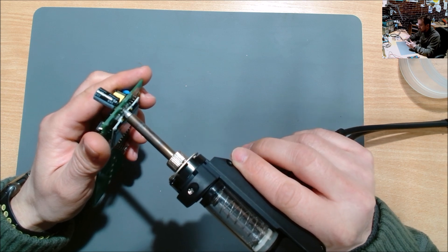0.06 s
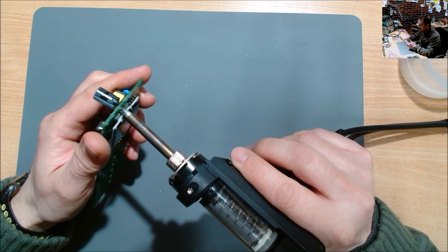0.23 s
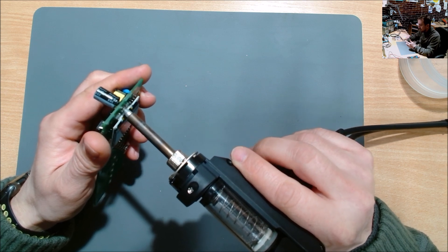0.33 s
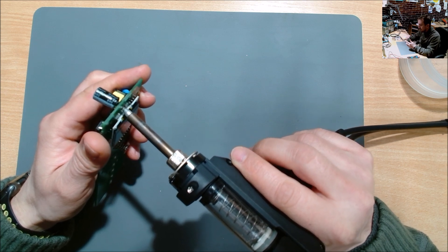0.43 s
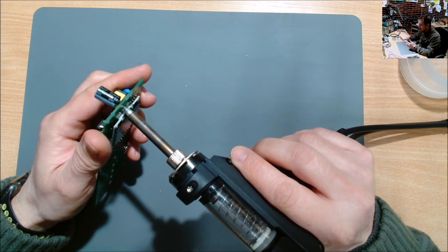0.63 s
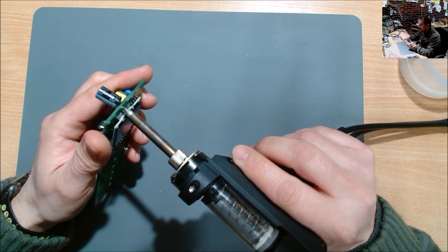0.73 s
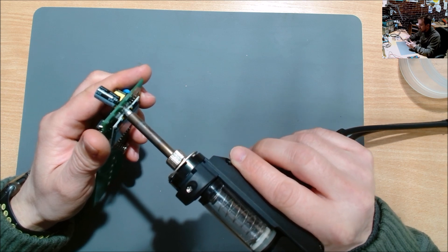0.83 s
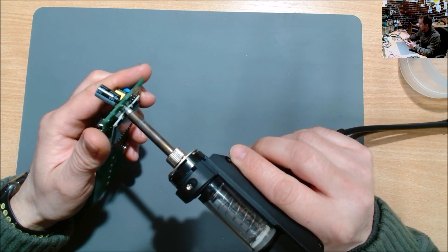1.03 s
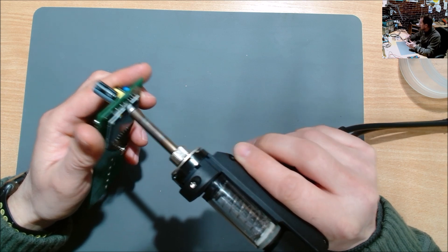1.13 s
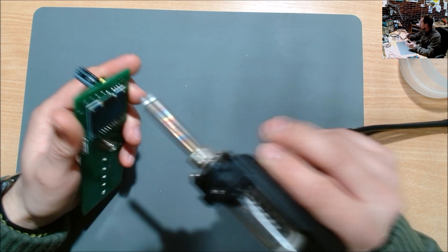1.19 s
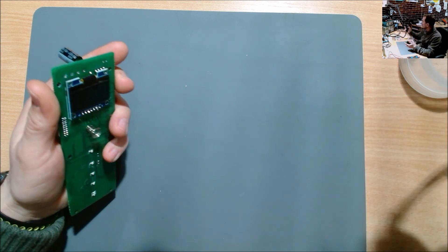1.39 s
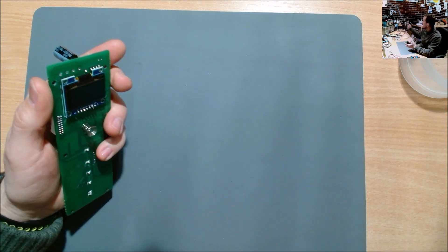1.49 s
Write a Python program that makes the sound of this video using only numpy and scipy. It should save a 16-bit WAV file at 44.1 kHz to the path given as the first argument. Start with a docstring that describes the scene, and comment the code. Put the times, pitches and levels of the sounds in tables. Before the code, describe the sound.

Close at a workbench in a quiet small room: a plastic trigger click, a buzzing diaphragm vacuum pump with nozzle hiss, tiny squeaks and a louder click as it stops, then soft sleeve and board handling.

```python
"""Workbench in a quiet room: a desoldering gun's diaphragm pump spins up, buzzes and coasts to a stop.
The buzz sums orders of the stroke rate, coloured by the housing, with rattling noise and a mount drone.
Shaped noise hisses through the nozzle, and short noise cracks snap the trigger at both ends.
Gliding fuzzy tones squeak as the nozzle leaves the joint, noise bursts rustle as hands move afterwards,
and steady sines make a faint fan whine over the room noise."""
import sys
import numpy as np
from scipy import signal
from scipy.fft import rfft, irfft
from scipy.io import wavfile
from scipy.ndimage import uniform_filter1d

SR = 44100
rng = np.random.default_rng(int(sys.argv[2]) if len(sys.argv) > 2 else 0)


def magnitude_from_level(level_db):
    """Linear magnitude for a level in decibels (20 dB per decade)."""
    exponent = np.asarray(level_db, float) / 20
    return 10 ** exponent


def file_out(sig):
    """Save sig as 16-bit WAV at sys.argv[1]."""
    # one column per channel
    cols = np.atleast_2d(sig).T
    # limit, then scale
    lim = np.clip(cols, -1, 1)
    pcm = np.round(lim * 32767).astype(np.int16)
    wavfile.write(sys.argv[1], SR, pcm)


N = 68355
T = np.arange(N) / SR


def unit(x):
    """Scales to rms 1."""
    return x / np.sqrt(np.mean(x ** 2) + 1e-20)


def level(x):
    """Evens out the slow loudness to an rms near 1."""
    power = uniform_filter1d(uniform_filter1d(x ** 2, 1500), 1500)
    return x / np.sqrt(power + 1e-12)


def curve(table, index=1, left=None, right=None):
    """Reads a column over time; left and right hold outside the table."""
    columns = np.transpose(table)
    return np.interp(T, columns[0], columns[index], left, right)


def read(table, hz):
    """Reads a spectrum in dB on a log frequency axis, -100 dB outside it."""
    f, db = np.transpose(table)
    return np.interp(np.log(hz + 1), np.log(f + 1), db, -100, -100)


def colour(x, db_at):
    """Minimum-phase filter with the gain db_at(Hz), so nothing sounds ahead of its cause."""
    log_gain = np.log(magnitude_from_level(np.maximum(db_at(np.fft.rfftfreq(8192, 1 / SR)), -100)))
    # the Hilbert transform of the log gain gives the phase
    log_response = np.conj(signal.hilbert(np.r_[log_gain, log_gain[-2:0:-1]]))
    impulse = np.fft.ifft(np.exp(log_response)).real[:4096]
    return signal.oaconvolve(x, impulse)[:len(x)]


def resonate(x, hz, width_hz):
    """Resonance of gain 1 that follows hz: shifted to 0 Hz, smoothed by one pole, shifted back."""
    turn = np.exp(2j * np.pi * np.cumsum(hz * np.ones(len(x))) / SR)
    r = np.exp(-np.pi * width_hz / SR)
    return 2 * (turn * signal.lfilter([1 - r], [1, -r], x / turn)).real


def noise(table, patchy_db):
    """Noise of rms 1 from random short-time spectra with drifting patches."""
    real, imag, patches = rng.standard_normal((N // 128 + 6, 257, 3)).T
    patches = unit(uniform_filter1d(uniform_filter1d(patches, 8, 0), 16, 1))
    tone_db = read(table, np.fft.rfftfreq(512, 1 / SR))[:, None]
    spectra = (real + 1j * imag) * magnitude_from_level(tone_db + patchy_db * patches)
    return unit(signal.istft(spectra, nperseg=512, noverlap=384)[1][:N])


def bands(x, edges_hz):
    """Splits into bands at the given edges."""
    spectrum = rfft(x)
    part = np.searchsorted(edges_hz, np.fft.rfftfreq(len(x), 1 / SR))
    return [irfft(spectrum * (part == k), len(x)) for k in range(len(edges_hz) + 1)]


def pump_speed():
    """Stroke rate of the diaphragm in Hz: it spins up, settles and coasts down."""
    # each: start_s, strokes_hz
    spin_up = [(.235, 29.8), (.29, 52.6), (.326, 59.4), (.344, 61.4), (.36, 74), (.385, 83.4)]
    running = [(.42, 85.6), (.486, 87.3), (.53, 87.8), (.66, 88.1), (.76, 89.0), (1.04, 90.0), (1.13, 90.2)]
    coast = [(1.15, 78), (1.17, 46.3), (1.21, 43), (1.3, 23), (1.4, 20)]
    return curve(spin_up + running + coast)


def pump(speed, turns):
    """Orders of the stroke rate sound through the housing; loose parts rattle and the mount drones when shaken."""
    # levels of the buzz over time: start_s, thump_db, low_buzz_db, housing_ring_db, upper_buzz_db, mount_db
    pump_levels = [(.235, -47, -52.5, -44.5, -50, -67), (.285, -34, -39.5, -30, -38, -34),
                   (.32, -28, -37, -30.5, -36.5, -37.5), (.37, -28.5, -35.5, -31, -33, -37),
                   (.43, -25, -33, -35, -37, -39.5), (.48, -24.5, -39, -34, -33.5, -45),
                   (.53, -25.5, -36.5, -26, -38, -67), (.72, -26, -39.5, -28, -35.5, -53),
                   (1.125, -24.5, -40, -25.5, -35.5, -71), (1.155, -35, -43.5, -37, -34.5, -45),
                   (1.18, -37.5, -40, -42, -41, -39.5), (1.205, -32, -41, -39.5, -43.5, -27),
                   (1.235, -39.5, -50.5, -43.5, -70, -41), (1.29, -51, -55, -51, -67, -35.5),
                   (1.31, -44, -73, -65, -54, -47), (1.345, -55, -92, -74, -67, -45),
                   (1.4, -59, -69, -69, -51.5, -53)]
    # edges between thump, low buzz, housing ring and upper buzz [Hz]
    split_hz = (320, 750, 1120)
    # relative level_db of orders 1, 2, 3.. at running speed
    stroke_db = [-19, 2.5, -8.5, -16.5, -22.5, -21, -18, -14, -23.5, 1, -4, -19.5, -22.5, -15.5, -19.5,
                 -13.5, -36, -15, -41, -26.5, -7, -18.5, -25.5, -14.5, -19, -18, -23, -31, -23, -21.5,
                 -20.5, -39, -27.5]
    # body response between and beyond those orders: pitch_hz, relative level_db
    housing = [(60, -8), (130, -7.5), (945, -8), (3300, -28.5), (4400, -35.5)]
    # rattle spectrum of the loose parts: pitch_hz, relative density_db (per Hz)
    shake = [(24, -69), (40, -17), (176, -9.5), (480, -14.5), (890, -18.5), (1140, -9), (1920, -11),
             (4000, -29), (5200, -71)]
    run_hz = 89.3
    spread_rad = 0.3  # phase spread of the push, per order squared
    waver_db = 2.4  # slow waver of each order, before its smoothing
    shake_db, off_speed_db = -19.5, 40.5  # rattle at full speed; its rise per share of speed lost
    shell_hz, shell_width_hz, shell_db = 945, 55, 45  # shell ring in the rattle; dB per share of speed lost
    mount_hz, mount_width_hz = 131.5, 7.7

    orders = [(k * run_hz, db) for k, db in enumerate(stroke_db, 1)]
    shape = sorted([(35, -25)] + orders + housing)
    waver = uniform_filter1d(rng.standard_normal((110, 80)), 3, 1)
    body = np.zeros(N)
    for k, row in enumerate(waver, 1):
        drift = np.interp(T, np.linspace(0, T[-1], len(row)), row)
        db = read(shape, k * speed) + waver_db * drift
        # low orders line up into a push, the rest fall at random
        phase = spread_rad * k ** 2 if k < 4 else 2 * np.pi * rng.random()
        body += magnitude_from_level(db) * np.cos(2 * np.pi * k * turns + phase)

    rattle = noise(shake, 6.4)
    slack = np.clip(1 - speed / run_hz, 0, 0.5)  # share of speed lost
    shell = resonate(rattle, shell_hz, shell_width_hz)
    rattle = rattle + magnitude_from_level(shell_db * np.minimum(slack, 0.3)) * shell
    body = level(body) + magnitude_from_level(shake_db + off_speed_db * slack) * rattle

    mount = resonate(body, mount_hz, mount_width_hz)
    mount = resonate(mount, mount_hz, 2 * mount_width_hz)
    parts = bands(body, split_hz) + [mount]
    return sum(magnitude_from_level(curve(pump_levels, k, -106, -92)) * level(part) for k, part in enumerate(parts, 1))


def knocks():
    """Single hard strokes off speed thump the body: short dying sines."""
    # start_s, level_db (before the decay), pitch_hz
    hard_strokes = [(.311, -17.5, 199), (.330, -19, 160), (0.348, -22.5, 272), (.360, -22, 171),
                    (1.152, -21.5, 222), (1.174, -16.5, 210), (1.191, -20.5, 128), (1.226, -26, 66)]
    decay_cycles = 4.9  # cycles to die by 60 dB
    out = np.zeros(N)
    for start_s, db, hz in hard_strokes:
        cycles = np.maximum(T - start_s, 0) * hz
        onset = np.minimum(2 * cycles, 1)
        out += magnitude_from_level(db - 60 * cycles / decay_cycles) * np.sin(2 * np.pi * cycles) * onset
    return out


def air(turns):
    """Nozzle hiss, puffing a little with each stroke, and a valve ringing in it."""
    # hiss over time: start_s, lower_level_db, upper_level_db
    air_levels = [(.225, -38, -31.5), (.28, -43, -45.5), (.37, -44, -42.5), (.5, -43, -40),
                  (.56, -41.5, -37), (.66, -43.5, -42.5), (.75, -43.5, -40.5), (1.04, -42, -39),
                  (1.07, -78, -52), (1.09, -37, -39), (1.115, -43.5, -34), (1.15, -39.5, -49),
                  (1.19, -43, -49), (1.25, -61.5, -66)]
    # hiss spectrum: pitch_hz, relative density_db (per Hz)
    air_tone = [(1760, 1.5), (3000, -7), (5400, -9.5), (5960, -6), (6620, -8.5), (8460, -1), (14700, -4.5),
                (16000, -2)]
    puff = 0.043  # depth of the swell per stroke
    valve_hz, valve_width_hz, valve_db = 8620, 120, -9  # dB against the upper hiss

    hiss = noise(air_tone, 2.5) * (1 + puff * np.cos(2 * np.pi * turns))
    valve = unit(resonate(rng.standard_normal(N), valve_hz, valve_width_hz))
    low, high = bands(hiss, (8000,))
    lower = magnitude_from_level(curve(air_levels, 1, -75.5, -83)) * unit(low)
    upper = magnitude_from_level(curve(air_levels, 2, -77.0, -97)) * (unit(high) + magnitude_from_level(valve_db) * valve)
    return lower + upper


def burst(start_s, peak_db, t60_s, centre_hz):
    """A crack of dying noise, strongest in gain at its centre frequency."""
    rise_s, skirt_db = 0.0005, 2  # skirt in dB per octave squared
    age = np.maximum(T - start_s, 0)
    x = rng.standard_normal(N) * np.minimum(age / rise_s, 1) * magnitude_from_level(-60 * age / t60_s)
    # a third brings the noise peaks near peak_db
    return magnitude_from_level(peak_db) * colour(x, lambda f: -skirt_db * np.log2((f + 1) / centre_hz) ** 2) / 3


def snaps():
    """Each trigger snap or tick cracks and rings the plastic grip."""
    # start_s, approximate peak_db, t60_s, centre_hz
    trigger = [(0.2212, -7.5, 0.029, 7900), (0.2224, -9.5, 0.021, 4200), (0.331, -17, 0.017, 5440),
               (1.0982, -13.5, 0.012, 5950), (1.1292, -8.5, 0.017, 5000), (1.1309, -6.5, 0.012, 1502),
               (1.1319, -3, 0.031, 3430), (1.159, -17, 0.031, 3930), (1.168, -24, 0.032, 4000)]
    # grip resonances: pitch_hz, relative level_db
    plastic = [(1000, 8.5), (1750, -10), (2550, -6.5), (3280, 2), (4150, -5), (4960, -20), (6500, -21),
               (9500, -9), (12550, -10)]
    ring_t60_s = 0.011
    crack = sum(burst(*row) for row in trigger)
    # bandwidth in Hz is 2.2 over the decay time
    ring = sum(magnitude_from_level(db) * resonate(crack, hz, 2.2 / ring_t60_s) for hz, db in plastic)
    return crack + magnitude_from_level(-1.5) * ring * np.sqrt(ring_t60_s * SR) / 8


def squeaks():
    """Short whistles through the narrowing gap: gliding sines with resonant noise as fuzz."""
    # start_s, length_s, start_hz, end_hz, level_db (sine peak), noise_share (rms against sine peak)
    whistles = [(1.05, .035, 15200, 14700, -36, 1.5), (1.056, .034, 12000, 12100, -35, .5),
                (1.083, .012, 11900, 9600, -30, 1.2), (1.1185, .008, 6900, 6850, -24, .1),
                (1.125, .015, 6450, 6700, -29, .2)]
    fuzz_width_hz = 910
    out = np.zeros(N)
    for start_s, length_s, start_hz, end_hz, db, noise_share in whistles:
        u = np.clip((T - start_s) / length_s, 0, 1)
        hz = start_hz + (end_hz - start_hz) * u
        tone = np.sin(2 * np.pi * np.cumsum(hz) / SR)
        fuzz = unit(resonate(rng.standard_normal(N), hz, fuzz_width_hz))
        out += magnitude_from_level(db) * np.sin(np.pi * u) * (tone + noise_share * fuzz)
    return out


def hands():
    """Sleeve rustle; fingers scrape the board and ring it."""
    # finger scrapes: start_s, approximate peak_db, t60_s, centre_hz
    rustles = [(1.3743, -28.5, 0.098, 4150), (1.424, -24.5, 0.039, 1410), (1.438, -31, 0.087, 6000),
               (1.4644, -28.5, 0.059, 1630), (1.48, -32, 0.052, 1500), (1.515, -34, 0.081, 1980)]
    # board resonances: pitch_hz, level_db (gain)
    board_modes = [(990, 17), (1450, 3), (1750, 16), (2120, 7), (2850, -17), (3800, -14)]
    # sleeve spectrum: pitch_hz, relative density_db (per Hz)
    cloth = [(18, -32), (30, 1.5), (328, -10.5), (962, -17), (1190, -12.5), (1760, -15.5), (16000, -34.5)]
    # sleeve loudness over time: start_s, level_db
    cloth_levels = [(1.2, -45.5), (1.38, -46.5), (1.41, -46.5), (1.47, -45.5), (1.55, -51)]
    board_width_hz = 73
    scrape = sum(burst(*row) for row in rustles)
    board = sum(magnitude_from_level(db) * resonate(scrape, hz, board_width_hz) for hz, db in board_modes)
    sleeve = magnitude_from_level(curve(cloth_levels, 1, -99)) * noise(cloth, 1.5)
    return sleeve + scrape + board


def room_tone():
    """Quiet room noise with a fan's whine of steady sines."""
    # room spectrum: pitch_hz, relative density_db (per Hz)
    room = [(18, -30), (30, 1), (140, -25), (210, -1.5), (380, -7.5), (540, -17), (684, -14.5), (960, -9.5),
            (1400, -17.5), (2600, -22.5), (4000, -32), (16000, -46)]
    # fan whine: pitch_hz, level_db (rms)
    fan = [(683.7, -65.5), (1556, -63.5), (1943, -74.5), (2336, -71.5)]
    whine = sum(magnitude_from_level(db) * np.sqrt(2) * np.sin(2 * np.pi * (hz * T + rng.random())) for hz, db in fan)
    return magnitude_from_level(-59) * noise(room, 1.2) + whine


def reverb(x):
    """Room reflections: sparse random taps dying away."""
    t60_s = 0.21
    taps = np.zeros(SR // 2)
    slots = np.arange(150, SR // 2 - 22, 22)  # one tap in every 22 samples
    taps[slots + rng.integers(0, 22, len(slots))] = rng.choice([-1., 1.], len(slots))
    taps *= magnitude_from_level(-60 * np.arange(len(taps)) / SR / t60_s)
    return signal.fftconvolve(x, taps / np.linalg.norm(taps))[:N]


def scene():
    """Mixes the bench in mono on two equal channels; only snaps and squeaks feed the reverb."""
    wet_db = -13
    speed = pump_speed()
    turns = np.cumsum(speed) / SR  # strokes so far
    sharp = snaps() + squeaks()
    machine = pump(speed, turns) + knocks() + air(turns)
    mono = machine + sharp + magnitude_from_level(wet_db) * reverb(sharp) + hands() + room_tone()
    return np.array([mono, mono])


def top_cut(x):
    """Nothing passes above 16.8 kHz: a steep low-pass."""
    return signal.sosfilt(signal.butter(12, 16810, fs=SR, output="sos"), x)


def record(dry):
    """Limits the band to 15.9 kHz with a linear-phase low-pass and finishes the mix."""
    low_pass = signal.firwin(255, 15900, window=("kaiser", 8), fs=SR)[None]
    mix = signal.oaconvolve(dry, low_pass, "same")
    return top_cut(mix)


dry = scene()
out = record(dry)
file_out(out)
```